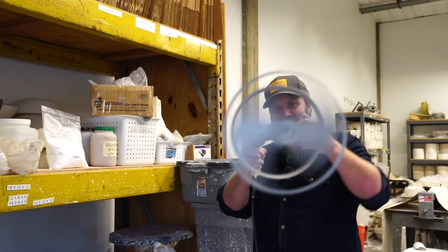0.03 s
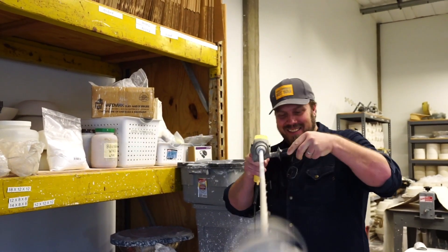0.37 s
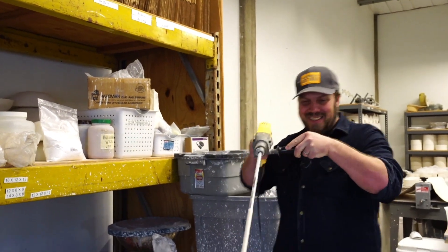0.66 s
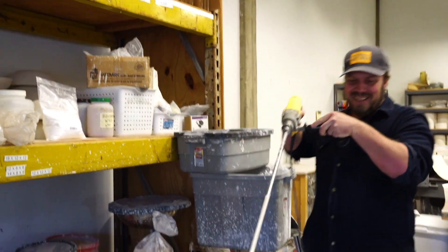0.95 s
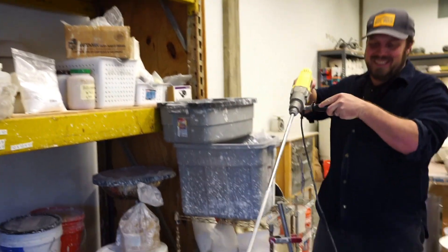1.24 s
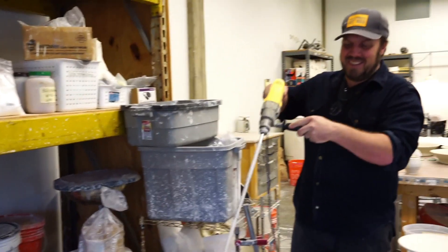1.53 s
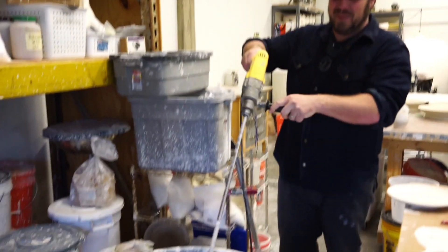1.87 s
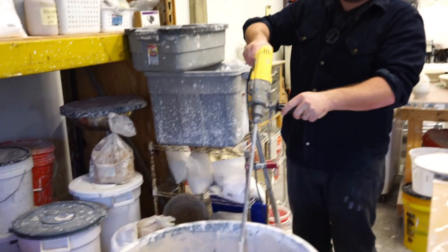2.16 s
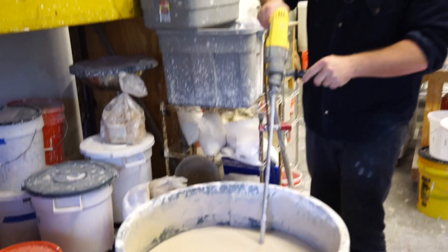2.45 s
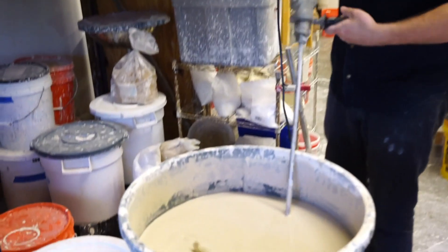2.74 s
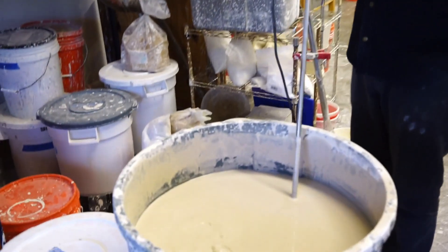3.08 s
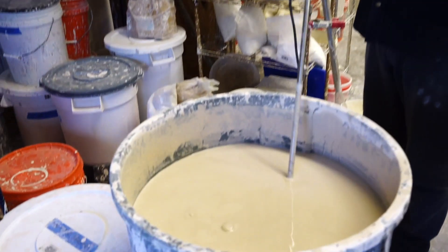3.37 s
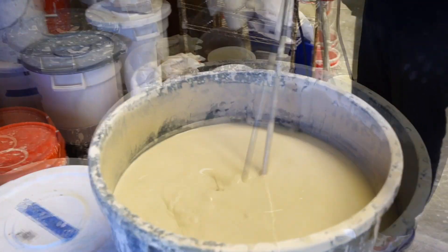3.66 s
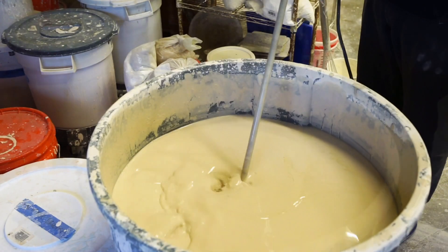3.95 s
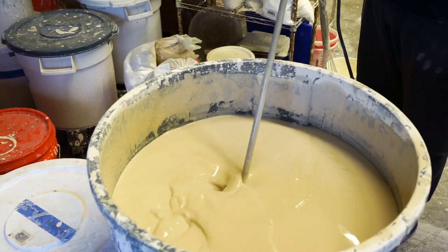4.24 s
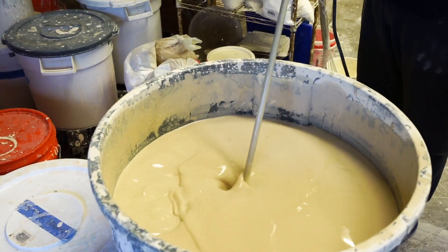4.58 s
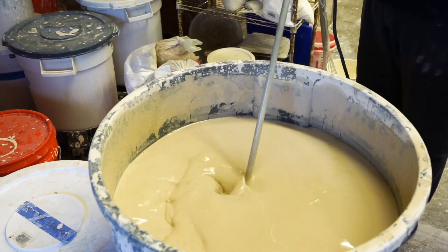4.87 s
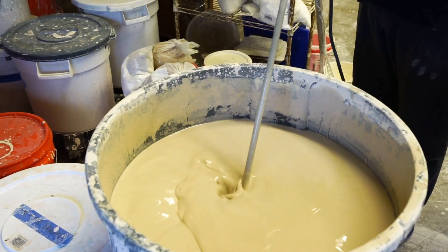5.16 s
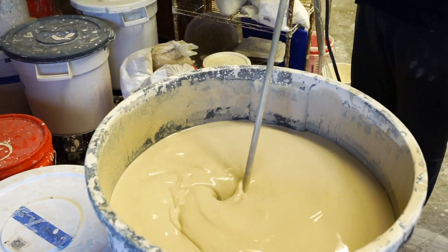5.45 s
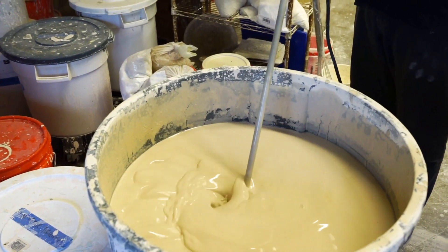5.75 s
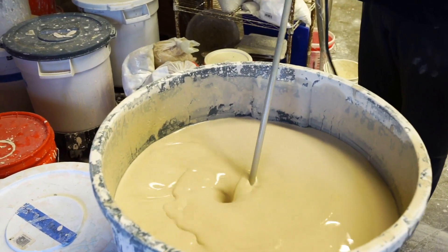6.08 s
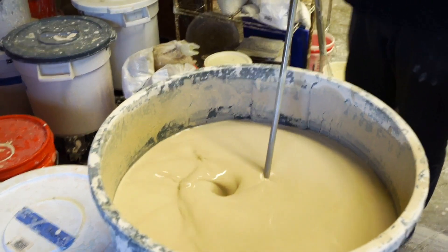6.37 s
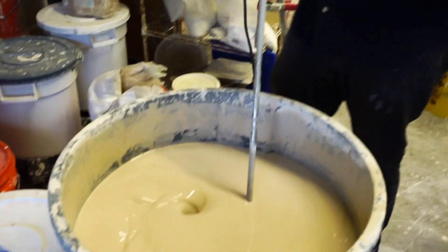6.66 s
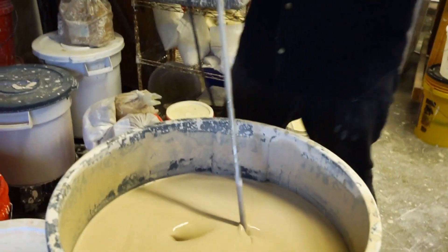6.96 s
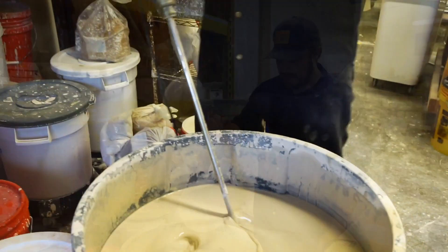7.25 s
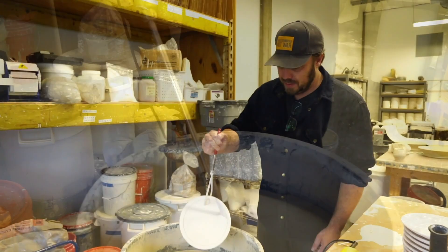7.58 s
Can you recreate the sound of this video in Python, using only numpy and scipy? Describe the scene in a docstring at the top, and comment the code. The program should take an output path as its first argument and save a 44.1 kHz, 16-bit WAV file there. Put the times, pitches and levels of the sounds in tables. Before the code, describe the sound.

An electric drill whines steadily as its paddle stirs a bucket of thick liquid with small gulps, then winds down.

```python
"""A corded drill is spinning a mixing paddle: its motor and gears whine over fan air and brush hiss. At about
1.6 s the paddle plunges into a bucket of liquid glaze, which churns and gulps. From 3 s the hand-held
microphone turns from the drill to the bucket, and the stirring goes on. At 6 s the trigger is let go: the pitch
falls, the glaze sloshes and the coasting gears scrape. From 7.25 s the drill grows fainter and at 7.5 s its
sound breaks off while the motor is still coasting; a quiet room fades in under the rumble of the hand on the
microphone."""
import sys
import numpy as np
from scipy import signal
from scipy.fft import rfft, irfft, next_fast_len
from scipy.io import wavfile

SR = 44100
rng = np.random.default_rng(int(sys.argv[2]) if len(sys.argv) > 2 else 0)


def output_pcm(signal):
    """Save a mono or channel-first signal as 16-bit PCM at the path in sys.argv[1].

    Samples are clipped to [-1, 1] before scaling.
    """
    pcm = np.clip(np.atleast_2d(signal).T, -1, 1) * 32767
    wavfile.write(sys.argv[1], SR, np.round(pcm).astype(np.int16))


N = 340375
T = np.arange(N) / SR
RELEASE_S = 6.02  # the trigger is let go
GEAR_RATIO = 2.586  # gear teeth meeting per turn of the motor


# How fast the powered motor turns, sagging as the glaze drags on it: t/s, f/Hz
MOTOR_SPEED = [(0.0, 528.5), (0.25, 526.8), (0.8, 525.6), (1.3, 526.6), (1.6, 525.4), (2.25, 514.3),
               (2.7, 512.4), (3.3, 509.4), (4.3, 507.6)]

def motor_speed(friction=117.3, air_drag=0.000597):
    """Turns per second, and octaves of slowing: once released, friction and air brake the motor."""
    powered, = curves(MOTOR_SPEED)
    # each second of coasting takes away friction + air_drag * speed ** 2
    balance_speed = np.sqrt(friction / air_drag)
    braking = np.sqrt(friction * air_drag) * np.maximum(T - RELEASE_S, 0)
    speed = balance_speed * np.tan(np.arctan(powered / balance_speed) - braking)
    return speed, np.log2(powered / speed)


# The hum at the motor's turning rate, fullest as the paddle takes the load: t/s, level/dB
HUM_LEVEL = [(0, -48), (.4, -41), (.8, -41), (1.75, -37), (2.6, -39.5), (2.95, -44), (4.35, -41),
             (4.8, -42), (6.12, -40), (6.3, -52.5)]
# The main whine, at twice that rate: t/s, level/dB
WHINE_LEVEL = [(0.02, -47), (.2, -35), (.4, -33), (.6, -25.5), (1.55, -28), (1.75, -30), (1.98, -26.5),
               (2.15, -28.5), (2.65, -27.5), (2.85, -23.5), (3.25, -21.5), (3.8, -24.5), (3.96, -39),
               (4.15, -33), (6.3, -31), (6.55, -40.5), (7.15, -46), (7.5, -62)]
# The tone an octave above the whine: t/s, level/dB
OCTAVE_LEVEL = [(0.1, -41), (.38, -30), (.78, -41), (1.17, -31), (1.58, -40.5), (1.83, -34), (2.5, -34.5),
                (2.78, -43), (3.22, -36), (3.7, -47.5), (6.0, -49), (6.38, -43), (6.55, -48), (7.5, -50)]

def motor_whine(turns, speed, slowed):
    """The spinning motor sings three tones; the paddle blades make the lowest one throb."""
    blades = np.sin(2 * np.pi * turns / 24 + 1.25 * drift(8.6))  # they meet the glaze unevenly
    throb_depth = 0.19 + 0.35 * swell(4.35, 0.92)  # deepest as a whirlpool opens
    hum = tone(turns, curves(HUM_LEVEL)[0] - 20 * slowed, waver=0.12, waver_hz=26.2)
    whine = tone(2 * turns, curves(WHINE_LEVEL)[0], waver=0.032 + 0.22 * slowed, waver_hz=18)
    octave_db = curves(OCTAVE_LEVEL)[0] + housing_boost_db(4 * speed)
    octave = tone(4 * turns, octave_db, waver=0.16, waver_hz=6.4)
    return hum * (1 + throb_depth * blades) + whine + octave


# The tone of the gear teeth: t/s, level/dB
GEAR_LEVEL = [(0, -47), (.6, -36), (.8, -49), (1.08, -29), (1.5, -34), (2.35, -47), (2.85, -33),
              (3.35, -42), (4.6, -48), (6.0, -43), (6.13, -41), (6.35, -44), (7.15, -52), (7.3, -42.5),
              (7.5, -50)]

def gear_whine(turns, over_bucket):
    """The meeting teeth make a tone, which wavers more once the microphone has turned to the bucket."""
    return tone(GEAR_RATIO * turns, curves(GEAR_LEVEL)[0], waver=0.19 + 0.33 * over_bucket, waver_hz=20)


# Weaker, higher tones: multiple of the motor rate, multiple of the gear rate, level/dB by the drill,
# level/dB over the bucket, gain/dB per octave of slowing, gain/dB at the crest of a swing
HIGH_TONES = [(6, 0, -40, -43, -8.5, 2.5), (0, 2, -44, -48.5, -7, 1.5), (0, 3, -53, -54.5, 5.5, -1),
              (1, 2, -51, -64, -30, -4), (7, 0, -50, -51, -32, -2), (8, 0, -47.5, -48.5, -30, 2.5),
              (6, 1, -47.5, -60, -30, 0), (10, 0, -47, -43, -45, 1), (12, 0, -46, -46, -30, -0.5),
              (16, 0, -56, -59, -30, 2), (26, 0, -61, -72, -30, 0)]

def overtones(turns, speed, slowed, near_db, over_bucket):
    """Motor and gear rates add up to high tones, which swell as the drill swings in the hand."""
    unloaded_db = 2.8 * (1 - ramp(0.54, 4.1))  # the motor sings most sharply before it is loaded
    swing = np.cos(2 * np.pi * (T - 0.05) / 0.758)  # through the room's loud and quiet spots
    moving = 1 - 0.85 * over_bucket  # then the drill is held nearly still
    out = np.zeros(N)
    for motor, gear, drill_db, bucket_db, coast_db, swing_db in HIGH_TONES:
        ratio = motor + gear * GEAR_RATIO
        level_db = near_db + drill_db + (bucket_db - drill_db) * over_bucket + coast_db * slowed
        level_db += unloaded_db * ratio / 6.8 + housing_boost_db(ratio * speed)
        level_db += (swing_db * swing + 1.7 * drift(3)) * moving
        out += tone(ratio * turns, level_db, waver=0.24 + 0.015 * ratio, waver_hz=6 + 1.23 * ratio)
    return out


def housing_boost_db(hz, ring_hz=1848, width_hz=163, peak_db=8):
    """The drill's case rings when a tone glides through its natural pitch."""
    return peak_db * np.exp(-((hz - ring_hz) / width_hz) ** 2)


def contact_whistle(turns, slowed, contacts=40):
    """The motor's ring of contacts whistles past the brushes, heard as it coasts."""
    return tone(contacts * turns, -46 - 11.5 * slowed, waver=1.44, waver_hz=90) * ramp(6.2, 0.2)


# The tone colour of the fan's broad rush: f/Hz, level/dB
FAN_COLOUR = [(150, -62), (400, -17), (650, -10), (850, -1), (1050, 2), (1400, 0.5), (1700, 2), (2200, -4),
              (3200, -13.5), (6000, -48)]
# The tone colour of the narrower whirr from the vents: f/Hz, level/dB
VENT_COLOUR = [(900, -36), (1250, -1), (1450, 2.5), (1680, 2), (1900, -6), (2500, -39)]

def cooling_fan(slowed, near_db, facing_s=0.17):
    """Fan air rushes; the vents face the microphone, swing away, and whirr softly over the bucket."""
    rush = noise(FAN_COLOUR, (1420, 1950))
    whirr = noise(VENT_COLOUR, (1200, 1900))
    rush_db = -32 + 1.48 * near_db - 9.2 * slowed + 0.87 * drift(13)
    facing = gain_of(-27 - np.maximum(75 * (facing_s - T), 18 * (T - facing_s)))  # fast up, slow down
    returning = gain_of(-43) * ramp(4.06, 0.43) * (1 - ramp(RELEASE_S, 0.21))
    return rush * gain_of(rush_db) + whirr * (facing + returning) * gain_of(2.6 * drift(15))


# The tone colour of the brushes, heard beside the drill: f/Hz, level/dB
HISS_BESIDE = [(1500, -26), (3000, -8), (4100, 1.5), (5100, 1.5), (6500, -1), (8300, 1.5), (9300, -2.5),
               (10500, -8.5), (13000, -6), (15500, -12)]
# The same hiss heard over the bucket: f/Hz, level/dB
HISS_ABOVE = [(1500, -36), (3400, -6.5), (4400, 2), (5100, 3), (6600, 1), (7800, -4), (9000, -0.5),
              (10500, -4.5), (12000, -4), (14000, -10), (15500, -9.5)]

def brush_hiss(slowed, near_db, over_bucket):
    """The brushes that feed the motor its current rub and hiss; with the current off they sound duller."""
    beside = noise(HISS_BESIDE, (4400, 8400))
    above = noise(HISS_ABOVE, (4400, 8400))
    bucket_share = over_bucket * (1 - 0.62 * ramp(6.2, 0.64))  # the drill is drawn back as it slows
    hiss = np.sqrt(1 - bucket_share) * beside + np.sqrt(bucket_share) * above
    dull = signal.sosfiltfilt(signal.butter(8, 9600, fs=SR, output="sos"), hiss)
    treble_db = -6 * ramp(5.65, 0.86) - 2 * swell(3.6, 1.0)  # also dips while the microphone turns
    hiss = dull + (hiss - dull) * gain_of(treble_db)
    return hiss * gain_of(-30.5 + 1.17 * near_db - 10.8 * slowed + 0.57 * drift(61))


# The tone colour of the running gearbox: f/Hz, level/dB
RASP_COLOUR = [(1200, -34), (2100, -0.5), (2700, 0), (3300, -1), (4200, -11.5), (6000, -12)]

def gear_rasp(slowed, near_db):
    """The turning gears make a rough, fluttering noise."""
    level_db = -32.5 + 2.27 * near_db - 1.4 * slowed + 0.59 * drift(110)
    return noise(RASP_COLOUR, (2250, 3600)) * gain_of(level_db)


# Short rubs in the gearbox: t/s, level/dB, half-length/s
GEAR_RUBS = [(6.978, -38, 0.014), (7.023, -39, 0.1), (7.094, -36.5, 0.028), (7.19, -39, 0.063),
             (7.27, -38.5, .02), (7.324, -45, 0.025), (7.456, -42, 0.029)]
# The tone colour they ring with: f/Hz, level/dB
RUB_COLOUR = [(1200, -19), (1800, -2), (2100, -12), (2450, 2), (2750, -3), (3100, 1.5), (3600, -12),
              (5000, -9), (8000, -14), (11000, -32)]

def gear_scrapes():
    """The gears rub grittily as they coast."""
    return noise(RUB_COLOUR, (2250, 3600)) * swells(GEAR_RUBS) * gain_of(1.5 * drift(270))


# The tone colour of churning glaze: f/Hz, level/dB
CHURN_COLOUR = [(60, -23), (140, -19), (200, -3.5), (280, -1.5), (450, 1), (800, -4), (1200, 0),
                (2500, -24)]
# Surges of glaze, the first as the paddle plunges in: t/s, level/dB, half-length/s
GLAZE_SURGES = [(1.63, -46, 0.17), (1.82, -44.5, 0.23), (2.08, -53.5, .2), (2.7, -71, .3),
                (5.86, -65, 0.063), (6.5, -78, 0.11), (7.3, -65, 0.39)]
# The tone colour of sloshing glaze: f/Hz, level/dB
GLAZE_SLOSH = [(400, -40), (600, -11), (850, 1), (1030, 5.5), (1200, -13), (1700, -31)]
# Short gulps of the glaze as the paddle enters and stirs:
# t/s, level/dB, f/Hz, half-length/s, rise/octaves per half-length
GLAZE_GULPS = [(1.447, -26, 1230, 0.047, 0.18), (1.52, -30.5, 730, 0.067, -0.33),
               (1.636, -22.5, 1226, 0.059, 0.0091), (1.825, -25.5, 890, 0.057, 0.024),
               (2.425, -33, 548, 0.059, -0.13), (3.885, -32, 1405, 0.029, 0.057),
               (3.97, -34, 1270, 0.038, 0.16), (4.057, -28, 1300, .025, -0.07),
               (4.075, -25.5, 1395, 0.02, 0.23), (4.325, -33, 520, .025, 0),
               (4.385, -31, 524, 0.033, 0.025), (4.452, -34, 1300, .025, 0.09),
               (5.808, -28, 1380, 0.031, 0.21), (5.853, -44, 396, 0.052, 0.67),
               (6.095, -32, 1290, 0.047, 0.13)]

def glaze(slowed, near_db):
    """The thick liquid churns in lumps, gulps, and sloshes round the slowing paddle."""
    stirring = gain_of(-61 + 2.1 * near_db - 5.3 * slowed) + swells(GLAZE_SURGES)
    churn = noise(CHURN_COLOUR, (150, 400)) * stirring * gain_of(3.1 * drift(25))
    slosh = noise(GLAZE_SLOSH, (600, 1200)) * gain_of(-35 - 9.5 * slowed + drift(14))
    bubbles = blips(GLAZE_GULPS) * (1 + 0.5 * drift(61))  # the thick skin of each bubble flutters
    return churn + slosh * ramp(5.9, 0.76) + bubbles


# How much the hand moves the microphone: t/s, level/dB
HAND_MOTION = [(0, -39), (.3, -38.5), (.75, -47), (1.24, -36.5), (1.92, -36), (2.4, -44.5), (3.4, -48),
               (4.2, -59), (5.4, -61), (6.75, -48), (7.22, -54), (7.36, -37), (7.57, -17), (7.72, -22.5)]
# The tone colour of its rumble: f/Hz, level/dB
RUMBLE_COLOUR = [(15, 17), (35, 11), (55, 7), (100, -3), (140, -6.5), (300, -20), (800, -50)]
# Dull bumps of the hand: t/s, level/dB, f/Hz, half-length/s, rise/octaves per half-length
HAND_BUMPS = [(3.03, -57, 88.4, 0.18, 0), (6.6, -64, 141, .06, 0), (7.31, -47, 88, 0.049, 0)]

def microphone_handling(sway_hz=11.7):
    """The hand-held microphone sways, too low to hear, and picks up rumble and bumps."""
    motion_db, = curves(HAND_MOTION)
    rumble_db = -36.5 + 0.86 * np.minimum(motion_db, -20)  # grows with the motion, up to a limit
    rumble = noise(RUMBLE_COLOUR, (50, 140)) * gain_of(rumble_db + 1.7 * drift(5))
    sway = tone(sway_hz * T, motion_db + 0.7 * drift(3.3), waver=0.051, waver_hz=1.7)
    return sway + rumble + blips(HAND_BUMPS)


# The tone colour of the room's ventilation: f/Hz, level/dB
AIR_COLOUR = [(60, -7), (150, -5), (350, 0.5), (600, -5.5), (1000, -7.5), (1750, -4.5), (2500, -11),
              (3800, -13), (4800, -22), (9000, -27.5), (15500, -30)]
# The room's low humming tones: f/Hz, level/dB
ROOM_TONES = [(75, -64), (113, -61), (242, -66), (363, -59)]

def room():
    """Ventilation and a low hum, which fade in at the end."""
    air = gain_of(-49) * noise(AIR_COLOUR, (150, 8000))
    hum = sum(tone(hz * T, db, waver=0.2, waver_hz=5) for hz, db in ROOM_TONES)
    return (air + hum) * ramp(7.25, 0.37)


def tone(turns, level_db, waver, waver_hz):
    """One pure tone plus its echoes in the room, which make its level and timing waver."""
    angle = 2 * np.pi * ((turns + rng.random()) % 1)
    wave = (1 + waver * drift(waver_hz)) * np.cos(angle) + waver * drift(waver_hz) * np.sin(angle)
    return np.sqrt(2) * gain_of(level_db) * wave


def noise(colour, band_hz):
    """Noise with the given tone colour, at strength (rms) 1 inside the band."""
    size = next_fast_len(N, True)
    hz = np.fft.rfftfreq(size, 1 / SR)
    points_hz, points_db = np.transpose(colour)
    shape = gain_of(np.interp(np.log(hz + 1), np.log(points_hz), points_db))
    shape /= 1 + (hz / points_hz[-1] / 2) ** 4  # dies away above the last point
    band_power = np.sum(shape[(hz > band_hz[0]) & (hz < band_hz[1])] ** 2) / len(hz)
    return irfft(rfft(rng.standard_normal(size)) * shape, size)[:N] / np.sqrt(band_power)


def blips(rows):
    """Short tones that swell, slide in pitch and die."""
    out = np.zeros(N)
    for s, db, hz, half_s, rise in rows:
        near = abs(T - s) < half_s
        turns = np.cumsum(hz * 2 ** (rise * (T[near] - s) / half_s)) / SR
        out[near] += gain_of(db) * swell(s, half_s)[near] * np.sin(2 * np.pi * turns)
    return out


def drift(rate_hz):
    """A random wobble of strength (rms) 1, mostly slower than the given rate."""
    size = N // 32 + 2
    hz = np.fft.rfftfreq(size, 32 / SR)
    coarse = irfft(rfft(rng.standard_normal(size)) / (1 + (hz / rate_hz) ** 4))
    wobble = np.interp(T, np.linspace(0, T[-1], len(coarse)), coarse)
    return wobble / np.sqrt(np.mean(wobble ** 2))


def swell(peak_s, half_s):
    """A soft bell shape that rises to 1 and falls again."""
    return np.clip(1 - ((T - peak_s) / half_s) ** 2, 0, 1) ** 4


def swells(rows):
    """One bell shape for each row of a table, added up."""
    return sum(gain_of(db) * swell(s, half_s) for s, db, half_s in rows)


def ramp(start_s, length_s):
    """A smooth rise from 0 to 1."""
    return np.sin(np.pi / 2 * np.clip((T - start_s) / length_s, 0, 1)) ** 2


def curves(rows):
    """Each column of a time table, joined by straight lines."""
    s, *columns = np.transpose(rows)
    return [np.interp(T, s, column) for column in columns]


def gain_of(db):
    """Turns decibels into a factor to multiply by."""
    return 10 ** (np.asarray(db) / 20)


# How near the drill sounds as the microphone turns away to the bucket: t/s, level/dB
DRILL_NEARNESS = [(0, 0), (.85, -1), (2.76, -1.72), (3.59, -3), (4.05, -6), (4.5, -5.5), (5.9, -5)]

def scene():
    """Drill, glaze, handling and room, all heard in the middle."""
    speed, slowed = motor_speed()
    turns = np.cumsum(speed * (1 + 0.00063 * drift(15.5))) / SR  # one slightly unsteady shaft
    near_db, = curves(DRILL_NEARNESS)
    over_bucket = ramp(3.1, 1.0)  # the microphone turns from the drill to the bucket
    mixing = motor_whine(turns, speed, slowed) + gear_whine(turns, over_bucket)
    mixing += overtones(turns, speed, slowed, near_db, over_bucket) + contact_whistle(turns, slowed)
    mixing += cooling_fan(slowed, near_db) + brush_hiss(slowed, near_db, over_bucket)
    mixing += gear_rasp(slowed, near_db) + glaze(slowed, near_db)
    fade = gain_of(-4.5 * ramp(7.25, 0.34))
    cut_off = 1 - ramp(7.5, 0.055)
    mono = (mixing * fade + gear_scrapes()) * cut_off + microphone_handling() + room()
    mono *= signal.windows.tukey(N, 0.002)  # no click at either end
    return np.array([mono, mono])


def record(dry, top_hz=15850):
    """The recorder cuts off the highest treble."""
    low_pass = signal.firwin(801, top_hz, window=("kaiser", 9), fs=SR)
    return signal.oaconvolve(dry, low_pass[None], "same")


dry = scene()
out = record(dry)
output_pcm(out)
```